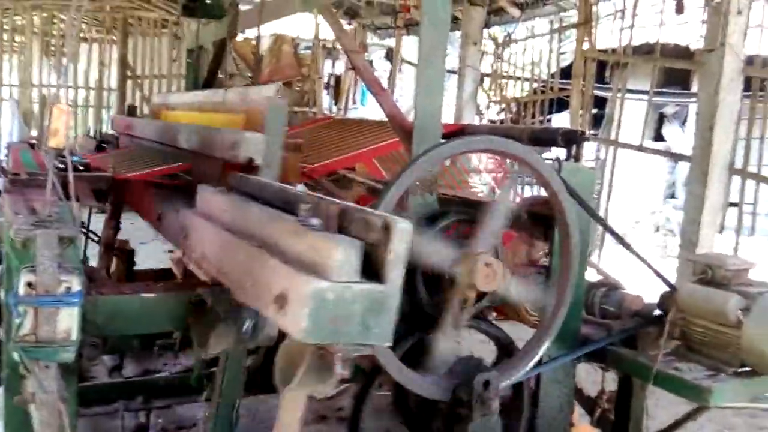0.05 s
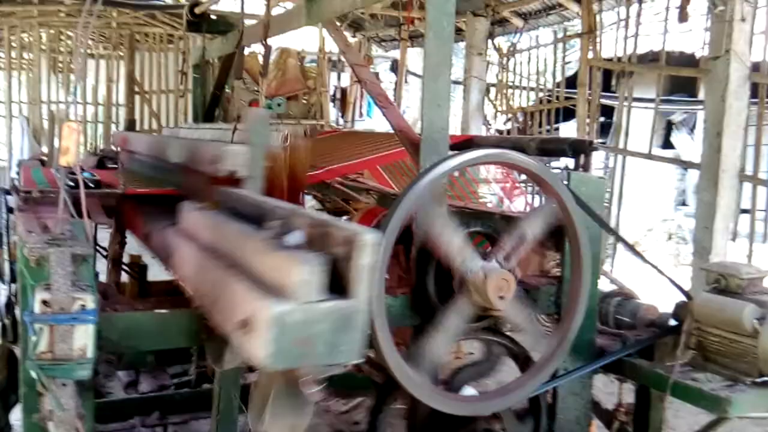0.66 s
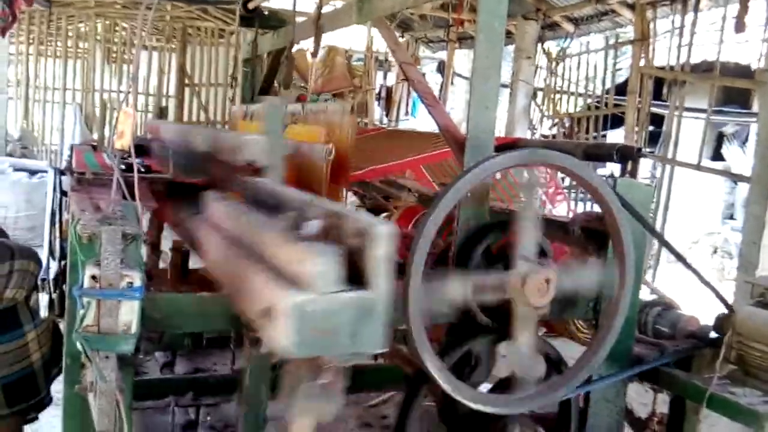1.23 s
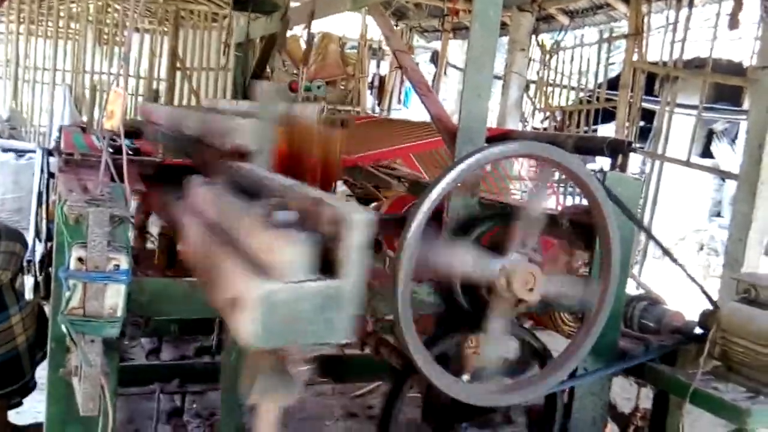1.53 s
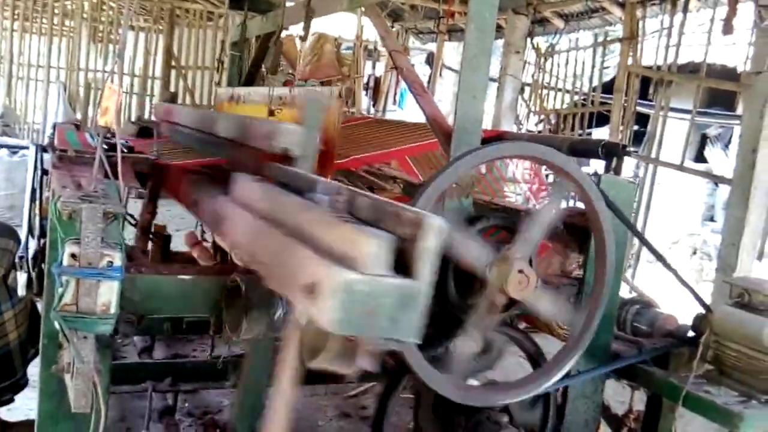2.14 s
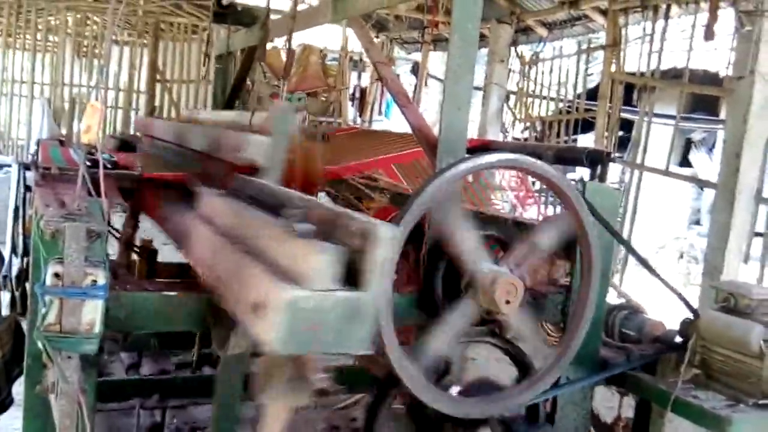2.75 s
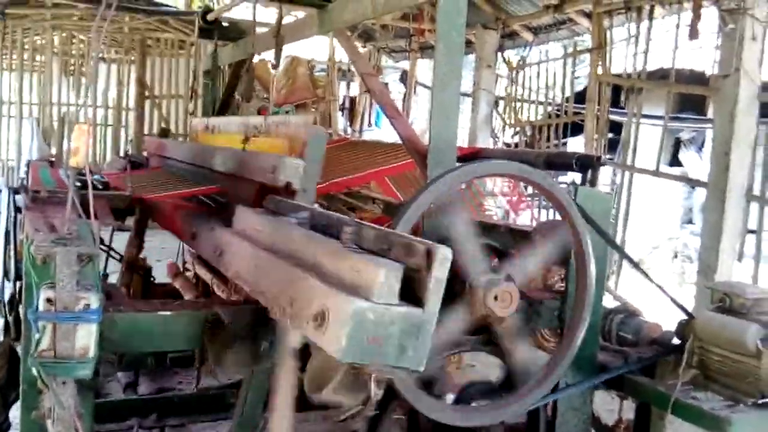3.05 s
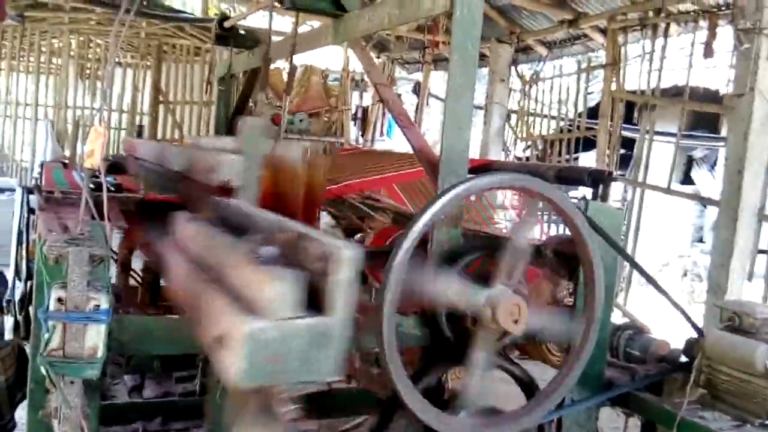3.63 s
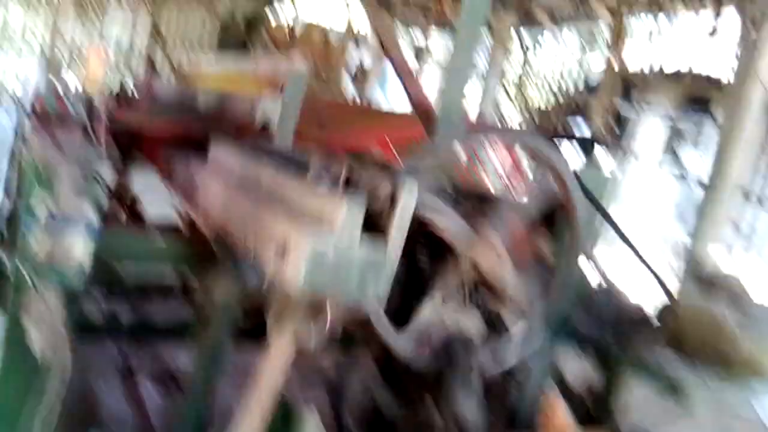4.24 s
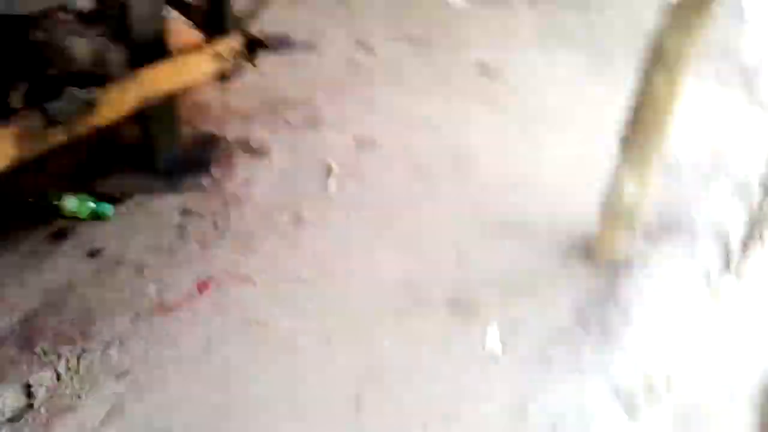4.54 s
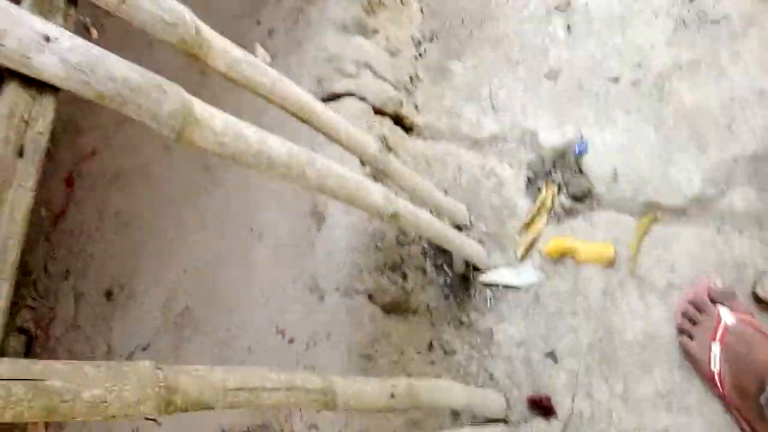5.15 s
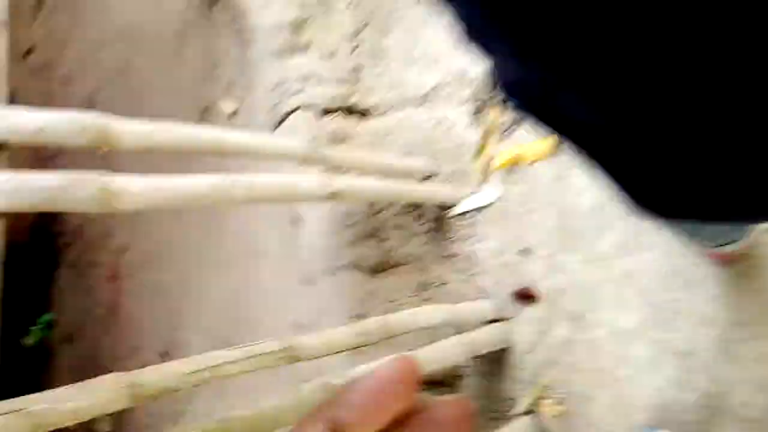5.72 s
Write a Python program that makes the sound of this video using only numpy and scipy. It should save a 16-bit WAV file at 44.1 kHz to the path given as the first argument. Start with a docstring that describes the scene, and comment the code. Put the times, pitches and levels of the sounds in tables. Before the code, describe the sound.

Sharp slams and knocks repeat in a fast, even pattern as a mechanical loom throws its shuttle from side to side. Loose metal parts clack and clink between the blows, over a constant drive rumble, gear rattle, a fine wire jingle and small squeaks. The sound is close, with a short, dull shed echo. The clatter keeps going throughout, turning a little fuller as the microphone drops lower at the end.

```python
"""A shuttle loom clatters in an open shed, heard from one end of its sley, the beam that packs the cloth.
Every 0.84 s sticks throw the shuttle across and back. It slams into a box at each side, the sley knocks,
and levers and loose steel parts clank and clink. The blows shake the heddles, the wires that lift the
threads, into a jingle. A dry joint squeaks, gears rattle and the belt drive rumbles under the roof.
Near the end the microphone sinks toward the floor, where the iron frame blocks a little of the treble."""
import sys
import numpy as np
from scipy import signal
from scipy.fft import rfft, irfft
from scipy.io import wavfile
from scipy.ndimage import uniform_filter1d, minimum_filter1d

SR = 44100
rng = np.random.default_rng(int(sys.argv[2]) if len(sys.argv) > 2 else 0)


def store_wav(level_fs):
    """Save 16-bit WAV to argv[1]."""
    pcm = np.round(np.clip(np.atleast_2d(level_fs), -1, 1) * 32767)
    wavfile.write(sys.argv[1], SR, pcm.T.astype(np.int16))


N = 254898
TIME = np.arange(N) / SR

# Levels in the tables are relative: each sound gets its overall loudness later.
# The shuttle slams into the near box: t/s, level/dB, clank f/Hz, clank level/dB
SLAMS = [(0.326, 0, 1457, -13), (1.167, -.5, 2360, -13.5), (2.0135, -2, 2345, -15),
         (2.849, -2, 1277, -15.5), (3.690, -2, 2370, -10.5), (4.527, 1, 2900, -15), (5.366, -3, 1680, -33)]
# The near throwing stick hits its buffer: t/s, level/dB, clank f/Hz, clank level/dB
THROWS = [(0.549, -4, 2700, -14), (1.384, -4.5, 1214, -19), (2.226, -4.5, 1296, -14),
          (3.065, -5, 1180, -14), (3.908, -4, 1204, -11), (4.747, -4, 1190, -9), (5.591, -5.5, 1290, -15)]
# That stick drops back on its stop: t/s, level/dB, clank f/Hz, clank level/dB
STOPS = [(0.68, -1.5, 2703, -28), (1.522, -2, 2880, -17), (2.373, -4.5, 2930, -10), (3.198, -2, 2726, -27),
         (4.046, -2, 2830, -25), (4.888, -5.5, 2850, -11.5), (5.725, -8, 2880, -13)]
# The shuttle lands in the far box as the sley packs the cloth: t/s, level/dB, clank f/Hz, clank level/dB
LANDINGS = [(-0.106, -6.5, 1250, -20), (0.734, -12, 1230, -20), (1.57, -13.5, 1220, -16),
            (2.411, -10.5, 1260, -10), (3.248, -11.5, 1240, -13), (4.091, -13.5, 1237, -9.5),
            (4.931, -13.5, 1890, -11), (5.771, -16.5, 1250, -24)]
# The sley knocks on its crank and a new round begins: t/s, level/dB
KNOCKS = [(0.071, -10), (0.912, -8), (1.756, -7.5), (2.594, -7), (3.433, -12.5), (4.272, -9), (5.112, -14)]
# The far throwing stick thuds through the frame: t/s, level/dB, boom level/dB
THUDS = [(0.138, -11, -45), (0.978, -12, -35), (1.818, -11.5, -40), (2.654, -11, -35), (3.496, -11.5, -35),
         (4.334, -12, -40), (5.177, -13.5, -30.5)]
# Small steel parts clink: t/s, level/dB, ping f/Hz, ping level/dB, heddle jingle level/dB
CLINKS = [(0.4359, -10, 5870, -19, -42), (0.7607, -12, 6400, -18, -47), (1.2745, -9.5, 6360, -13, -59),
          (1.5988, -16.5, 6220, -14, -55), (2.1176, -11, 6130, -17, -44), (2.151, -16, 6400, -22, -52),
          (2.4319, -21, 6270, -21, -48), (2.9572, -10, 6280, -19, -35.5), (3.1792, -17, 6360, -24, -58),
          (3.2829, -14, 6330, -16, -51), (3.7928, -11, 6070, -19, -40), (4.123, -14.5, 6300, -20, -49),
          (4.6399, -10, 5770, -14, -28), (5.4765, -15, 1657, -16, -40), (5.64, -29, 3400, -20, -60),
          (5.69, -32, 3400, -18, -60)]
# Loose links clack as they pull tight: t/s, level/dB
CLACKS = [(0.475, -7.5), (1.309, -8.5), (1.646, -14), (2.154, -8), (2.988, -7), (3.588, -18), (3.832, -6.5),
          (3.88, -17), (4.675, -9), (5.513, -11)]

# Each sound's tone as heard through the microphone, which is dull above 7 kHz
# and adds a sheen at 15 kHz: f/Hz, level/dB
SLAM_TONE = [(59, -95), (100, -46), (398, -6), (930, -4), (1280, 2.5), (1910, -0.5), (2370, 4), (4110, -2),
             (4770, 1.5), (5300, -7.5), (6150, 1.5), (7940, -19.5), (13200, -37), (15000, -33),
             (16000, -29)]
THROW_TONE = [(59, -46), (100, -32), (202, -16), (583, -8), (1030, -3), (1230, 2), (1910, -3.5),
              (2690, 0.5), (4770, -2), (6290, -6), (8110, -21), (11200, -24.5), (12900, -36), (15000, -20),
              (16000, -26)]
STOP_TONE = [(100, -35), (340, -12), (600, -9), (900, 4), (1300, -1.5), (1650, -2), (2100, 2.5), (2900, 3),
             (4000, -0.5), (6400, -2), (7800, -20), (11000, -37), (16000, -46)]
LANDING_TONE = [(59, -71), (100, -23), (315, -12), (608, -3.5), (1310, -1.5), (1650, -3.5), (1910, -4.5),
                (2470, -1), (4670, -4.5), (6700, -11.5), (8460, -27.5), (10500, -34), (12900, -46),
                (15000, -30), (16000, -41)]
KNOCK_TONE = [(59, -54), (100, -25), (373, -4.5), (595, -7.5), (891, 3), (1030, -3.5), (1610, 3),
              (1910, -5.5), (2930, -7), (3250, -5.5), (5420, -8), (8280, -29), (9820, -34.5), (11900, -44),
              (16000, -36)]
THUD_TONE = [(35, -95), (60, -62), (172, -23.5), (380, -16), (503, -7), (882, -3), (1200, -0.5),
             (1310, -4.5), (2410, -5.5), (2770, -5), (3270, -5.5), (4860, -9), (6580, -15.5), (8320, -32),
             (16000, -49.5)]
CLINK_TONE = [(300, -30), (2000, -8), (4500, 3), (5600, 2.5), (6700, 1.5), (7600, -6), (9500, -16.5),
              (11200, -12.5), (13300, -28), (15200, -11), (16000, -20)]
CLACK_TONE = [(59, -57), (100, -25), (424, -10.5), (1330, -4), (1610, 3.5), (2000, -8), (2470, -2),
              (3780, 2), (4200, -1.5), (6420, -4), (9210, -25), (11400, -22), (13500, -40), (15000, -21),
              (16000, -56)]
WIRE_TONE = [(3000, -22), (6400, 12), (8000, -4), (10000, -4), (11300, -10.5), (13200, -12), (15200, 3),
             (16000, -12)]
RATTLE_TONE = [(290, -28.5), (500, -4.5), (946, 1), (1600, -1.5), (2130, -2.5), (2360, -5.5), (2610, -2),
               (2980, -3.5), (3200, -2), (6510, -11), (8580, -30.5), (10700, -33), (13400, -46),
               (15100, -41), (16000, -49)]
RUMBLE_TONE = [(12, -57), (20, -36), (43, -52), (70, -25), (114, -12.5), (204, -2.5), (270, -6), (313, 0),
               (410, 1.5), (448, 5.5), (700, -10), (910, -3.5), (1540, -120)]

# The pitches at which each part rings (a negative boost is a dip): f/Hz, width/Hz, boost/dB
SLAM_PEAKS = [(1320, 120, 5.5), (1570, 100, -11), (2550, 60, 0)]
THROW_PEAKS = [(1220, 68, 1.8), (2920, 74, 3.7)]
STOP_PEAKS = [(880, 60, 4), (1930, 170, 4.7), (2930, 370, 3.9)]
LANDING_PEAKS = [(1240, 80, 4.9), (1870, 650, 1.7)]
KNOCK_PEAKS = [(890, 83, 2.8), (1550, 62, 3), (2432, 27, 18.2), (2800, 360, 13), (9780, 300, 15.3)]
THUD_PEAKS = [(214, 23, 5), (545, 27, 4.8), (9800, 420, 9.5)]
CLINK_PEAKS = [(6060, 850, 2.1), (6660, 360, 6.1), (10450, 300, 4)]
CLACK_PEAKS = [(1650, 140, 4.3), (2870, 130, 3.3)]
WIRE_PEAKS = [(9700, 150, 3), (10400, 160, 4), (11100, 200, 6.4)]
RATTLE_PEAKS = [(1193, 120, 4.4), (1553, 150, 5.3), (2440, 90, 8.9)]

# The dry joint rubs four times a round: t/s into the round, low note level/dB, high level/dB, length/s
RUBS = [(0.14, -30.5, -39, 0.092), (0.343, -29.5, -48, 0.032), (0.562, -27, -34.5, 0.058),
        (0.748, -33, -54, 0.042)]
# How strongly the joint squeaks: t/s, level/dB
DRYNESS = [(0, -8), (0.45, -2), (0.7, -7), (1.2, -9.5), (1.48, -3.5), (1.7, -5), (2.1, 2.5), (2.75, -2),
           (3.15, -8.5), (3.55, -11), (4.0, -0.5), (4.3, -6), (4.55, -20), (5.78, -22)]
# The drive works harder on each swing of the sley: t/s into the round, level/dB, hold/s
SWINGS = [(0.0, -37, .14), (0.402, -37.5, .14)]
# The microphone sinks toward the floor: t/s, share of the way down (0 to 1)
SINKING = [(4.2, 0.2), (4.7, 0.68), (5.1, 0.94), (5.78, 1)]
# How the tone changes near the floor: f/Hz, level/dB
FLOOR_TONE = [(60, 2), (130, -5), (220, 1.5), (450, 0), (950, 2.5), (1250, 0.5), (1750, 4.5), (2400, -1),
              (3400, -1), (5500, -2.5), (10000, -1), (16000, -1.5)]

ROUND_S = .84   # one trip there and back
LAUNCH_S = -.012   # a stick launches the shuttle just before it hits its buffer


def shuttle():
    """The shuttle slams into the near box and bounces once; the frame blurs its far landing."""
    slams = SLAMS + lighter_hits(SLAMS, lag_s=.0135, change_db=-5)
    near = blows(slams, SLAM_TONE, SLAM_PEAKS, level_db=-11.5,
                 rise_s=0.0016, hold_s=0.0045, t60=0.038, tail_db=-17, tail_t60=0.64, alike=0.51)
    far = blows(LANDINGS, LANDING_TONE, LANDING_PEAKS, level_db=-10,
                rise_s=0.001, hold_s=0.011, t60=0.35, tail_db=-9.5, tail_t60=0.43, alike=0.28)
    return near + far


def throwing_sticks():
    """The near stick throws, hits its buffer and drops back; the far one thuds through the frame."""
    throws = THROWS + lighter_hits(THROWS, lag_s=LAUNCH_S, change_db=-4.5)
    near = blows(throws, THROW_TONE, THROW_PEAKS, level_db=-11.5,
                 rise_s=0.0015, hold_s=0.006, t60=0.037, tail_db=-10, tail_t60=0.44, alike=0.38)
    drop = blows(STOPS, STOP_TONE, STOP_PEAKS, level_db=-12,
                 rise_s=0.0019, hold_s=0.0041, t60=0.047, tail_db=-43, tail_t60=.15, alike=0.36)
    far = blows(THUDS, THUD_TONE, THUD_PEAKS, level_db=-10.5,
                rise_s=0.0015, hold_s=0.018, t60=0.45, tail_db=-18, tail_t60=.5, alike=0.3)
    return near + drop + far


def sley():
    """The swinging beam knocks on its crank, much the same way every round."""
    return blows(KNOCKS, KNOCK_TONE, KNOCK_PEAKS, level_db=-12.5,
                 rise_s=0.00044, hold_s=0.0044, t60=0.16, tail_db=-7.5, tail_t60=0.49, alike=0.83)


def loose_parts():
    """Steel parts touch lightly, then clink; slack links clack, also just ahead of each slam."""
    clink_hits = CLINKS + lighter_hits(CLINKS, lag_s=-.02, change_db=-9)
    clack_hits = CLACKS + lighter_hits(SLAMS, lag_s=-.011, change_db=-12)
    clinks = blows(clink_hits, CLINK_TONE, CLINK_PEAKS, level_db=-9,
                   rise_s=0.00034, hold_s=0.0033, t60=0.014, tail_db=-11.5, tail_t60=0.28, alike=0.16)
    clacks = blows(clack_hits, CLACK_TONE, CLACK_PEAKS, level_db=-12.5,
                   rise_s=0.0027, hold_s=0.0084, t60=0.14, tail_db=-22, tail_t60=.2, alike=0.18)
    return clinks + clacks


def lighter_hits(table, lag_s, change_db):
    """A weaker hit goes with each blow; a negative lag puts it first."""
    return [(s + lag_s, peak_db + change_db) for s, peak_db, *_ in table]


def blows(table, tone, peaks, level_db, rise_s, hold_s, t60, tail_db, tail_t60, alike, size=22050):
    """Each blow stays loud for a few milliseconds, then drops to a fading tail."""
    t, force = TIME[:size], np.zeros(N + 2 * size)
    repeated = rng.standard_normal(size)   # the same in every blow; alike is its share of the power
    chatter = np.pad(contacts(per_s=12000, spread_db=1.84), size, "wrap")
    attack = 1 - np.exp(-t / rise_s)
    held_burst = from_db(-60 * np.maximum(t - hold_s, 0) / t60)   # t60: seconds to fade by 60 dB
    tail = from_db(tail_db - 60 * t / tail_t60)
    shape = attack * np.hypot(held_burst, tail)
    for s, peak_db, *_ in table:
        at = size + round(s * SR)
        noise = np.sqrt(alike) * repeated + np.sqrt(1 - alike) * chatter[at:at + size]
        force[at:at + size] += from_db(peak_db + level_db) * shape * noise
    return colour(force[size:size + N], tone, peaks)


def contacts(per_s, spread_db):
    """Tiny taps of uneven size come at random moments, with an average power of 1."""
    sizes = from_db(spread_db * np.minimum(rng.exponential(1, N), 4)) * rng.choice([-1, 1], N)
    return unit_power(sizes * (rng.random(N) < per_s / SR))


def colour(sound, tone, peaks, size=4096):
    """Give a sound the tone and ringing pitches it has when heard through the microphone."""
    hz = np.maximum(np.arange(size // 2 + 1) * SR / size, 1)
    tone_hz, tone_db = np.transpose(tone)
    level_db = np.interp(np.log(hz), np.log(tone_hz), tone_db)
    for centre, width, boost_db in peaks:
        level_db += boost_db / (1 + (2 * (hz - centre) / width) ** 2)
    # a minimum-phase filter: nothing rings before it is struck
    cepstrum = irfft(np.log(from_db(level_db)))
    first_half = np.arange(size) < size // 2
    response = irfft(np.exp(rfft(2 * cepstrum * first_half)))
    return signal.fftconvolve(sound, response / np.linalg.norm(response))[:N]


def clanks():
    """Levers ring under the main blows, and the small steel parts ping."""
    return (struck_metal(SLAMS, lag_s=0.00306, rise_s=0.0016, t60=0.052)
            + struck_metal(THROWS, lag_s=LAUNCH_S, rise_s=0.0014, t60=0.045)
            + struck_metal(STOPS, lag_s=0.002035, rise_s=0.00099, t60=0.029)
            + struck_metal(LANDINGS, lag_s=0.00091, rise_s=0.0016, t60=0.031)
            + struck_metal(CLINKS, lag_s=0.001003, rise_s=0.00096, t60=0.032))


def struck_metal(table, lag_s, rise_s, t60, size=8192):
    """Each hit makes a metal part ring with one note that dies quickly."""
    t, out = TIME[:size], np.zeros(N + 2 * size)
    for s, _, hz, peak_db, *_ in table:
        at = size + round((s + lag_s) * SR)
        shape = (1 - np.exp(-t / rise_s)) * from_db(peak_db - 60 * t / t60)
        out[at:at + size] += shape * np.sin(2 * np.pi * (hz * t + rng.random()))
    return out[size:size + N]


def heddles(idle_db, blocked_db):
    """Hundreds of thin wires touch at random: a fine, bright jingle that the blows stir up."""
    jingles = [(s, jingle_db) for s, *_, jingle_db in CLINKS]
    power = (from_db(idle_db) ** 2
             + shaking(SLAMS, kick_db=-42, rise_s=.005, t60=0.52)
             + shaking(THROWS, kick_db=-39, rise_s=.004, t60=0.37)
             + shaking(LANDINGS, kick_db=-27, rise_s=.03, t60=.5)
             + shaking(KNOCKS, kick_db=-35, rise_s=.012, t60=0.58)
             + shaking(THUDS, kick_db=-39, rise_s=.012, t60=0.5)
             + shaking(jingles, kick_db=4.5, rise_s=0.0022, t60=0.17))
    stir = np.sqrt(power) * from_db(blocked_db * floor_share())
    touches = colour(stir * contacts(per_s=1600, spread_db=4.5), WIRE_TONE, WIRE_PEAKS)
    return touches + stir * ringing_wires(per_s=72, t60=0.036, level_db=-11)


def ringing_wires(per_s, t60, level_db, size=4096):
    """Single wires are plucked at random, and each rings on at one of three high pitches."""
    t, out = TIME[:size], 0
    for hz, _, _ in WIRE_PEAKS:
        ring = np.sin(2 * np.pi * hz * t) * from_db(-60 * t / t60)
        out += signal.fftconvolve(contacts(per_s, spread_db=5.5), ring)[:N]
    return from_db(level_db) * unit_power(out)


def shaking(table, kick_db, rise_s, t60, hold_s=0):
    """The power of the shaking that each push starts: it rises, holds and dies away."""
    t, power = TIME[::40], 0
    for s, peak_db, *_ in table:
        age = np.maximum(t - s, 0)
        fade_db = -60 * np.maximum(age - hold_s, 0) / t60
        attack = 1 - np.exp(-age / rise_s)
        power += (from_db(peak_db + kick_db + fade_db) * attack) ** 2
    return np.interp(TIME, t, power)


def dry_joint(notes_hz, waver_hz, rough_db, idle_db):
    """Rubbing makes a steel joint squeak on two uneven notes; between rubs both notes linger faintly."""
    out, t = 0, TIME[::40]
    dryness_db = np.interp(TIME, *np.transpose(DRYNESS))
    for k, hz in enumerate(notes_hz):
        swell = sum(from_db(note_db[k]) * np.exp(-(2 * (t - s) / length) ** 2)
                    for lag_s, *note_db, length in RUBS for s in each_round(lag_s))
        pitch = hz + waver_hz * drift(43)
        level = np.interp(TIME, t, swell) + from_db(idle_db[k])
        level *= from_db(dryness_db + rough_db * drift(29))
        out += level * np.sin(2 * np.pi * np.cumsum(pitch) / SR)
    return np.sqrt(2) * out


def gears(load, idle_db, blocked_db):
    """Pins and gear teeth rattle in clumps, louder with the swings and blows."""
    power = (from_db(idle_db) ** 2 + from_db(14) ** 2 * load
             + shaking(SLAMS, kick_db=-20.5, rise_s=0.0029, t60=0.62)
             + shaking(THROWS, kick_db=-23.5, rise_s=0.011, t60=1.0)
             + shaking(LANDINGS, kick_db=-5.5, rise_s=0.028, t60=0.51))
    clumps_db = 1.63 * drift(60)
    level = np.sqrt(power) * from_db(clumps_db - 5 + blocked_db * floor_share())
    return colour(level * contacts(per_s=4500, spread_db=2.5), RATTLE_TONE, RATTLE_PEAKS)


def belt_drive(load, idle_db):
    """The drive rumbles all the time, swells with the swings and blows, and is louder near the floor."""
    booms = [(s, boom_db) for s, _, boom_db in THUDS]
    power = (from_db(idle_db) ** 2 + load
             + shaking(booms, kick_db=3, rise_s=0.0057, t60=0.36)
             + shaking(SLAMS, kick_db=-43, rise_s=.004, t60=0.49)
             + shaking(LANDINGS, kick_db=-36, rise_s=0.02, t60=0.97))
    level = np.sqrt(power) * from_db(-4 + 2.5 * floor_share())
    return colour(level * rng.standard_normal(N), RUMBLE_TONE, [])


def swing_load():
    """The power of the shaking as the drive pushes the sley, twice a round."""
    load = 0
    for lag_s, level_db, hold_s in SWINGS:
        pushes = [(s, level_db) for s in each_round(lag_s)]
        load += shaking(pushes, kick_db=-0.5, rise_s=0.0055, t60=0.39, hold_s=hold_s)
    return load


def shed(sound, t60, echo_db, first_echo_s, cutoff_hz):
    """The roof and floor scatter the sound into a short, dull echo."""
    t = TIME[:SR]
    tail = rng.standard_normal(SR) * from_db(-60 * t / t60) * (t > first_echo_s)
    lowpass = signal.butter(1, cutoff_hz, fs=SR, output="sos")
    tail = signal.sosfilt(lowpass, tail / np.linalg.norm(tail))
    return sound + from_db(echo_db) * signal.fftconvolve(sound, tail)[:N]


def sink_to_floor(sound, level_db):
    """Near the floor the frame blocks some treble and the middle pitches grow."""
    share = floor_share()
    return (1 - share) * sound + share * from_db(level_db) * colour(sound, FLOOR_TONE, [])


def floor_share():
    """How far down the microphone is at each moment; 1 is at the floor."""
    return np.interp(TIME, *np.transpose(SINKING))


def each_round(lag_s):
    """The times that fall lag_s into each round, counting the one under way at the start."""
    starts = [s for s, _ in KNOCKS]
    return np.array([starts[0] - ROUND_S] + starts) + lag_s


def drift(rate, step=40):
    """A smooth random wobble of typical size 1, changing about rate times a second."""
    pole = np.exp(-2 * np.pi * rate * step / SR)
    noise = rng.standard_normal(N // step + 2002)
    slow = signal.lfilter([1], [1, -2 * pole, pole * pole], noise)[2000:]   # skip while it settles
    return np.interp(np.arange(N) / step, np.arange(len(slow)), unit_power(slow))


def from_db(db):
    """Turn decibels into a number to multiply by."""
    return 10 ** (np.asarray(db) / 20)


def unit_power(x):
    """Scale a signal to an average power of 1."""
    return x / np.sqrt(np.mean(x ** 2) + 1e-20)


def scene():
    """The whole loom under its roof, in one channel."""
    loom = shuttle() + throwing_sticks() + sley() + loose_parts() + clanks()
    loom += heddles(idle_db=-68, blocked_db=-0.5)
    load = swing_load()
    loom += gears(load, idle_db=-26.5, blocked_db=-2.5) + belt_drive(load, idle_db=-43.5)
    loom += dry_joint(notes_hz=(2417, 3050), waver_hz=7.2, rough_db=4, idle_db=(-44, -56))
    in_shed = shed(loom, t60=0.5, echo_db=-13.5, first_echo_s=0.0118, cutoff_hz=4830)
    return sink_to_floor(in_shed, level_db=-1.24)[None]


def record(dry):
    """A fast limiter turns down the hardest peaks, and the treble above 16 kHz is cut away."""
    ceiling, window_samples = .5, 66
    gain = (1 + (np.abs(dry) / ceiling) ** 6) ** (-1 / 6)
    gain = uniform_filter1d(minimum_filter1d(gain, window_samples), window_samples)
    lowpass = signal.ellip(10, .2, 80, 16000, fs=SR, output="sos")
    return signal.sosfilt(lowpass, dry * gain)


dry = scene()
out = record(dry)
store_wav(out)
```